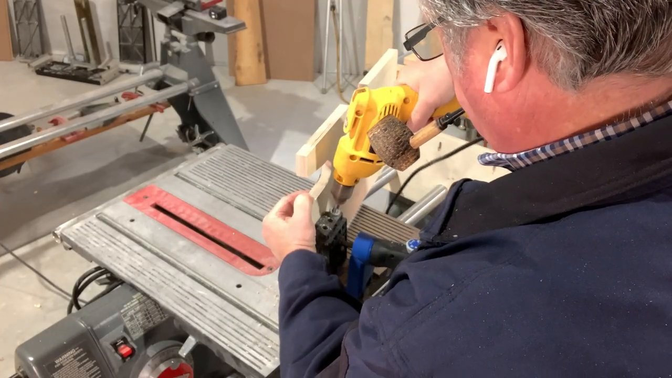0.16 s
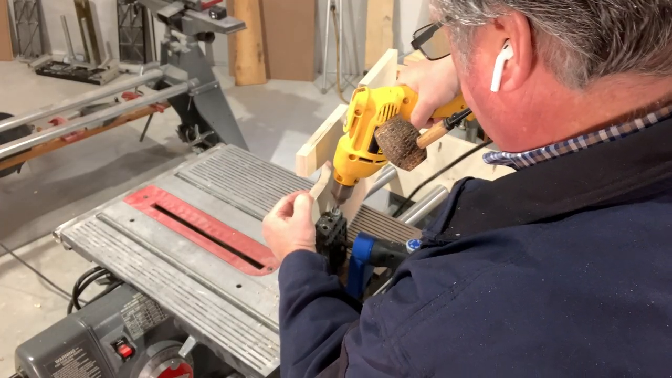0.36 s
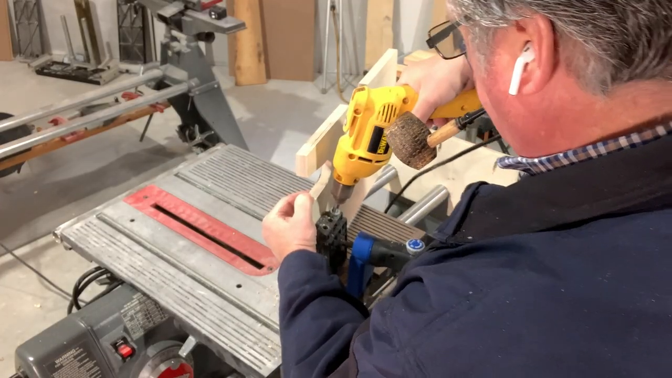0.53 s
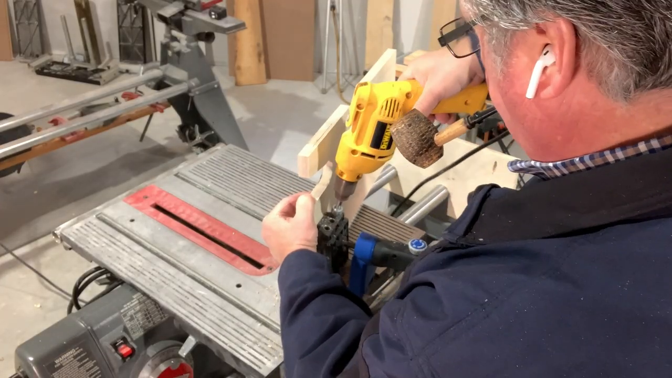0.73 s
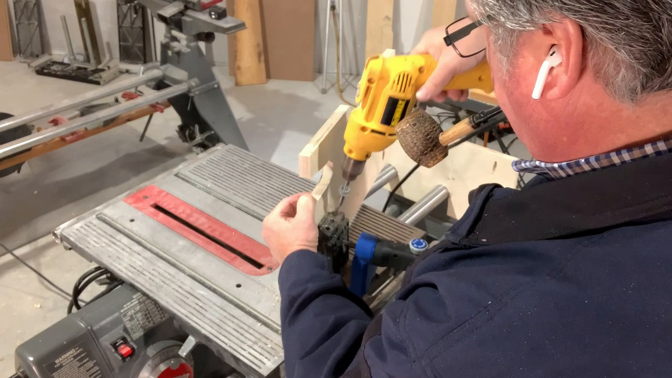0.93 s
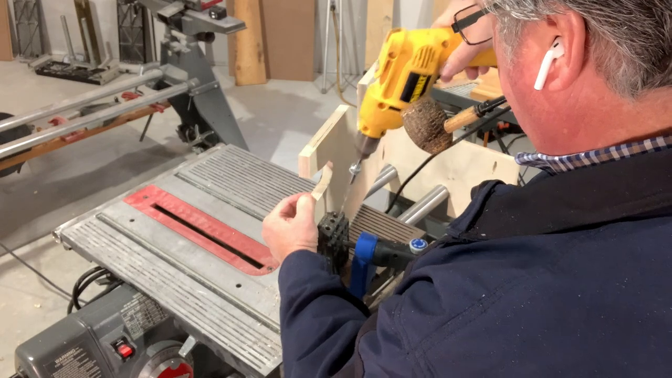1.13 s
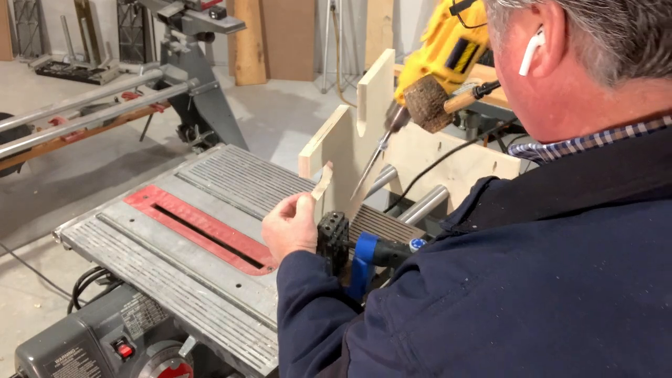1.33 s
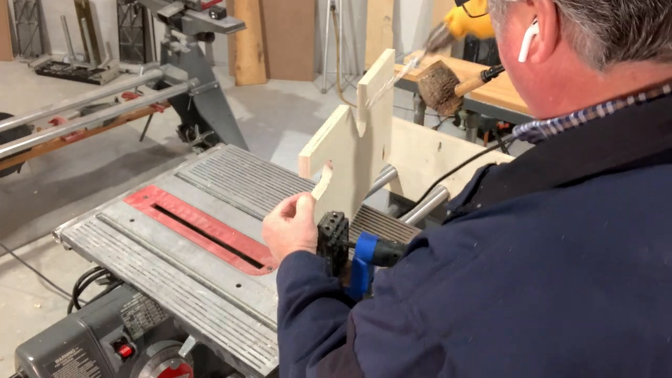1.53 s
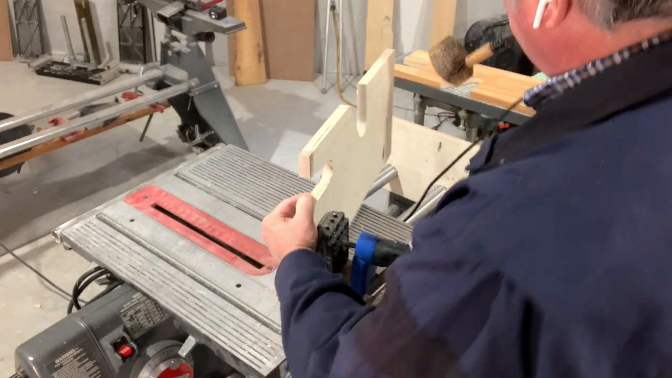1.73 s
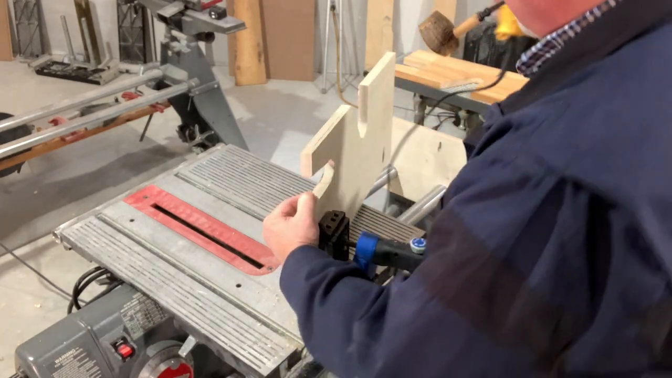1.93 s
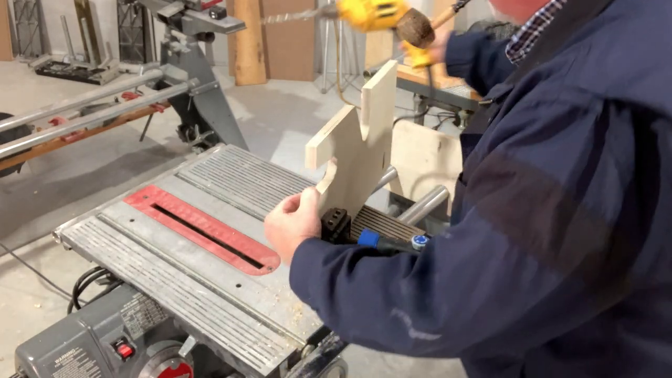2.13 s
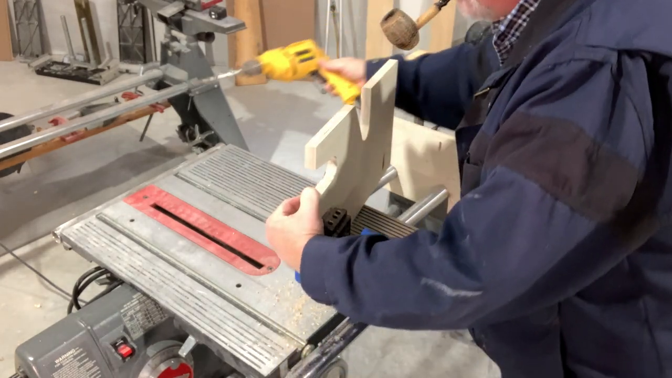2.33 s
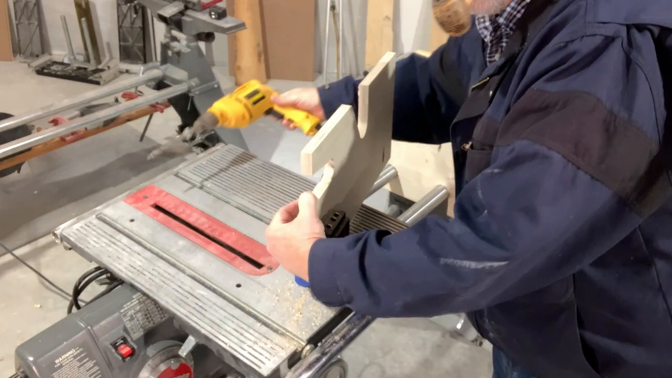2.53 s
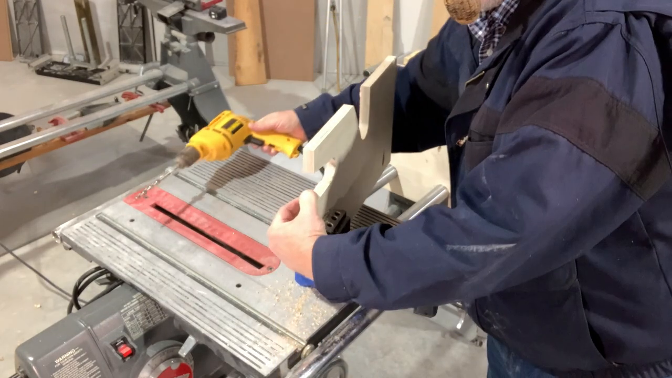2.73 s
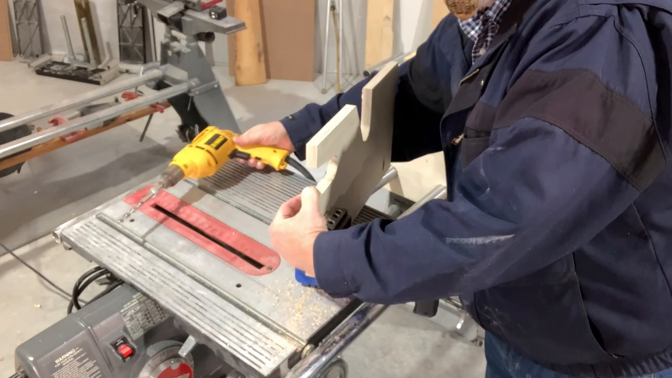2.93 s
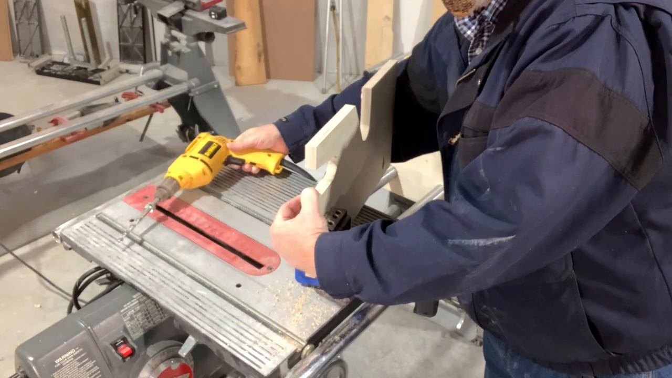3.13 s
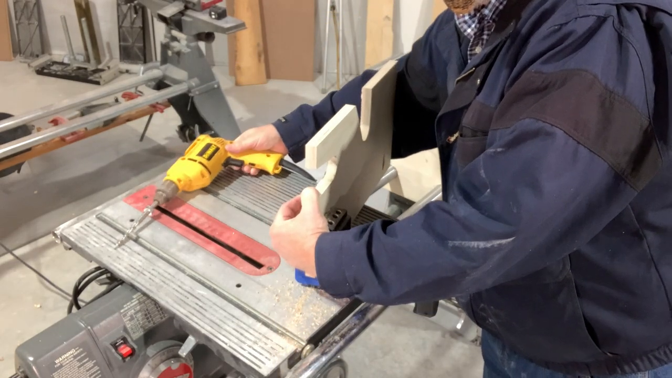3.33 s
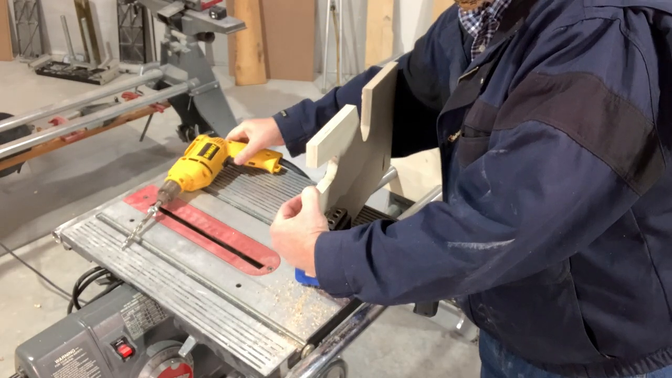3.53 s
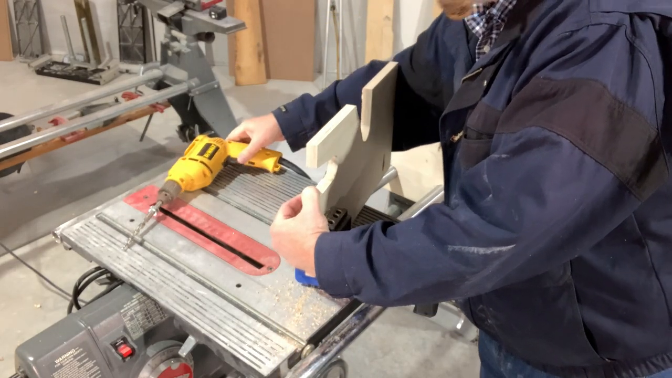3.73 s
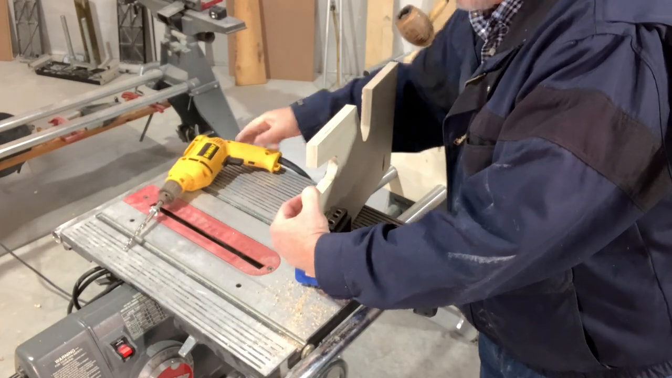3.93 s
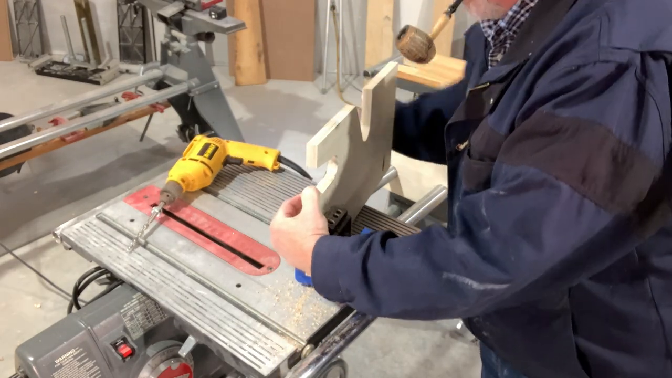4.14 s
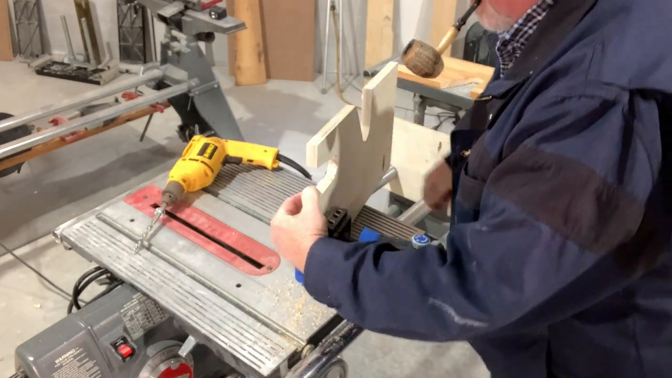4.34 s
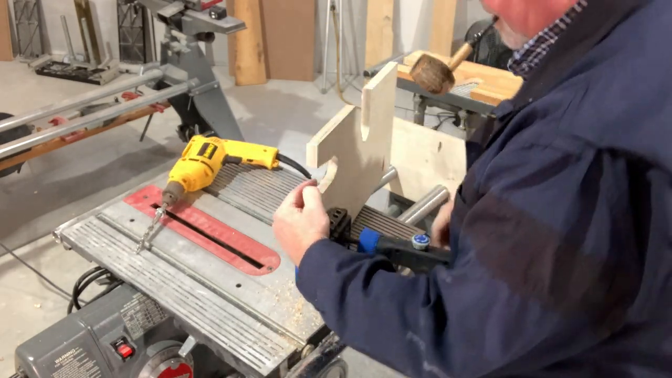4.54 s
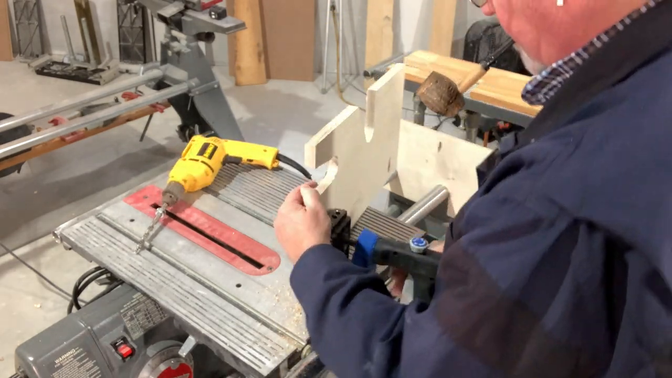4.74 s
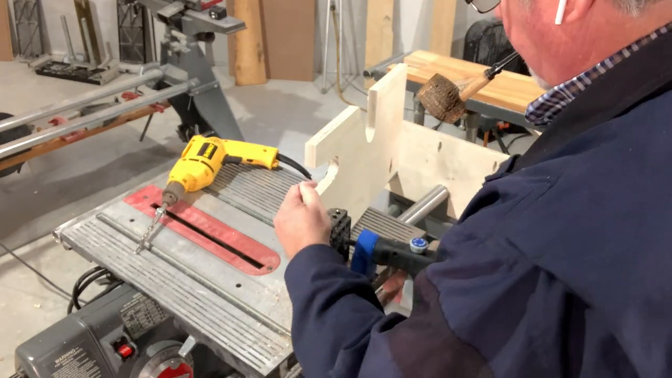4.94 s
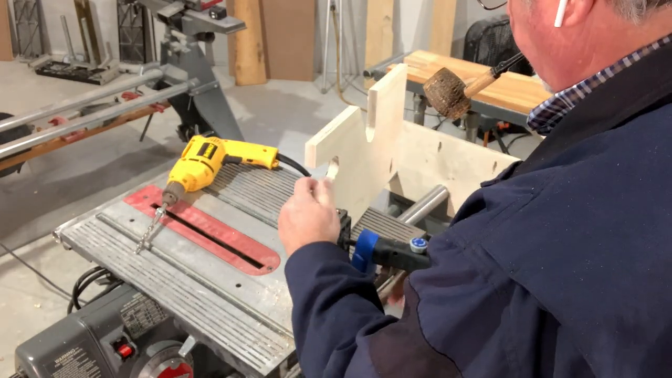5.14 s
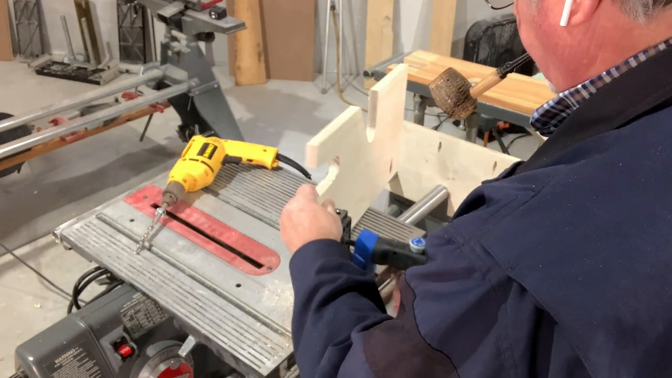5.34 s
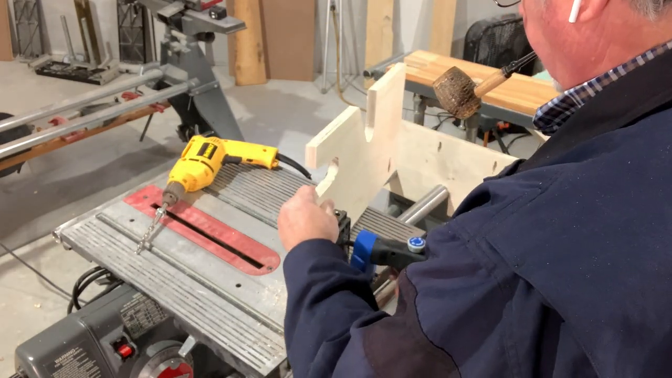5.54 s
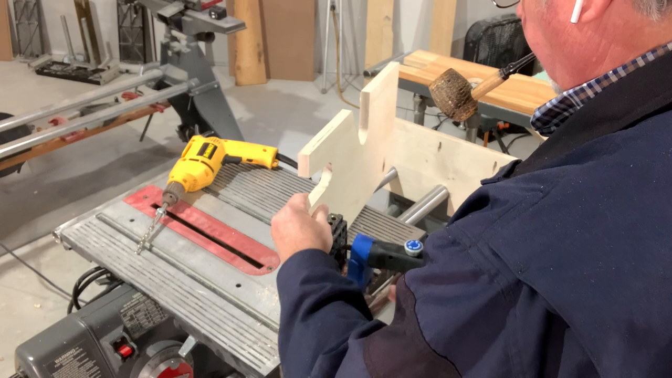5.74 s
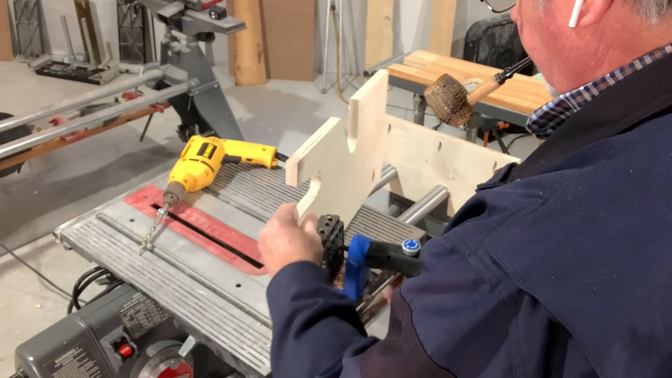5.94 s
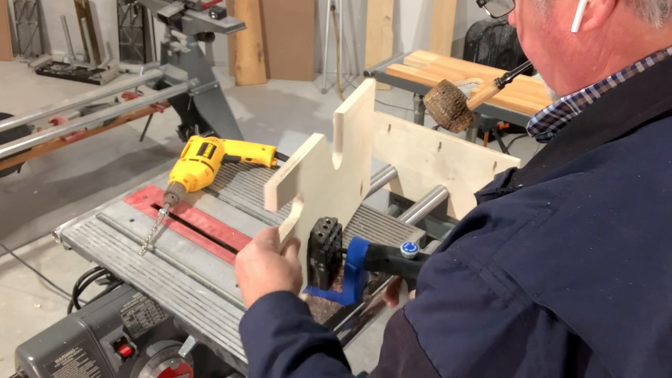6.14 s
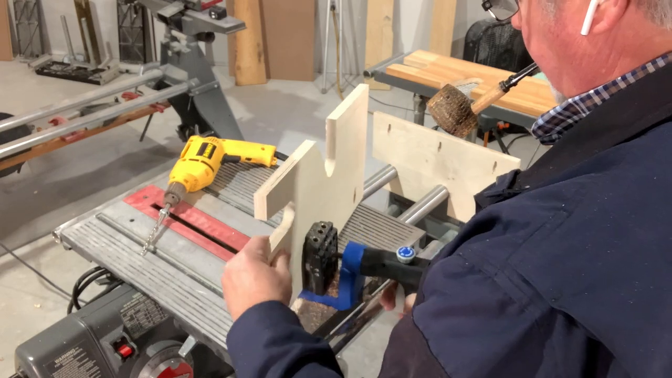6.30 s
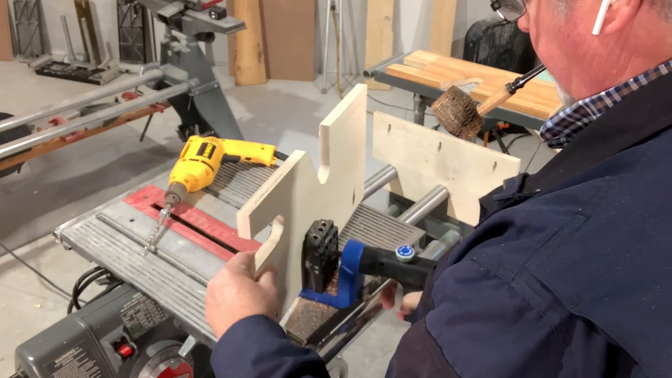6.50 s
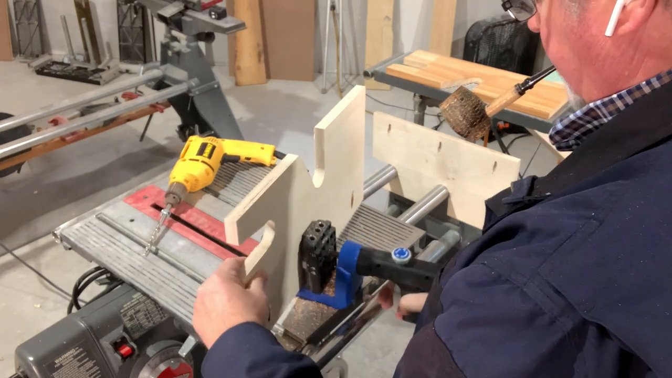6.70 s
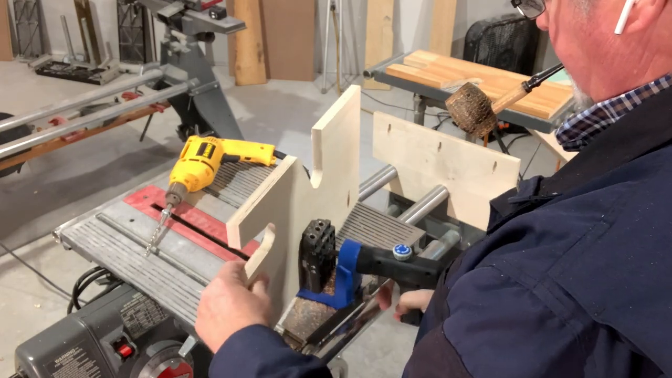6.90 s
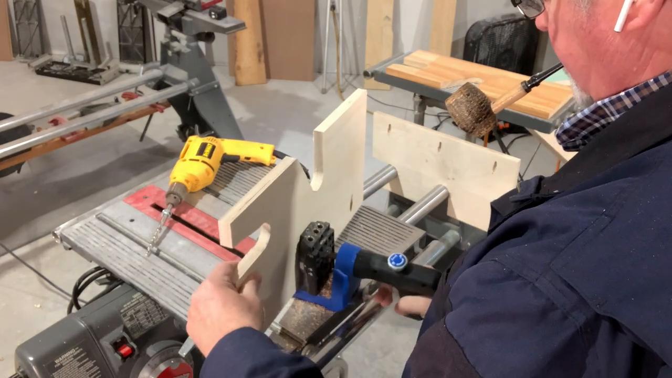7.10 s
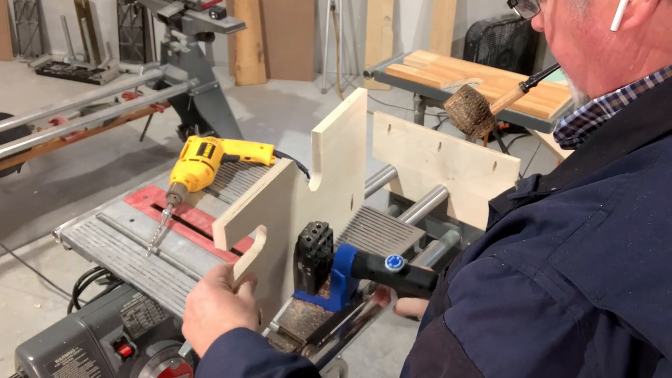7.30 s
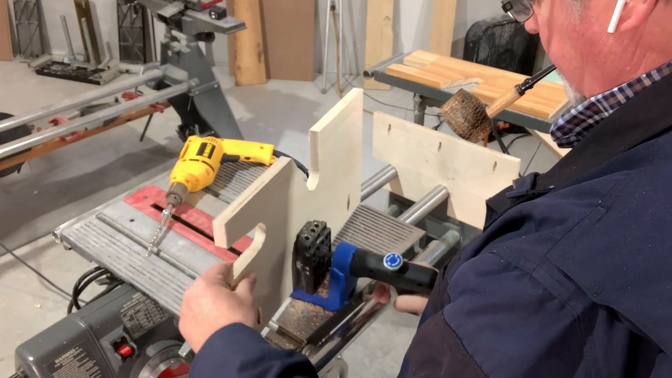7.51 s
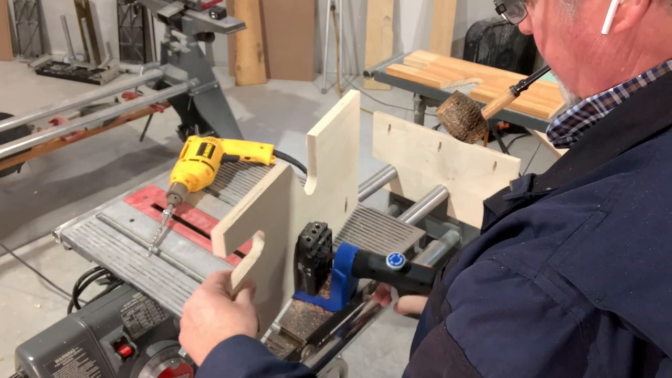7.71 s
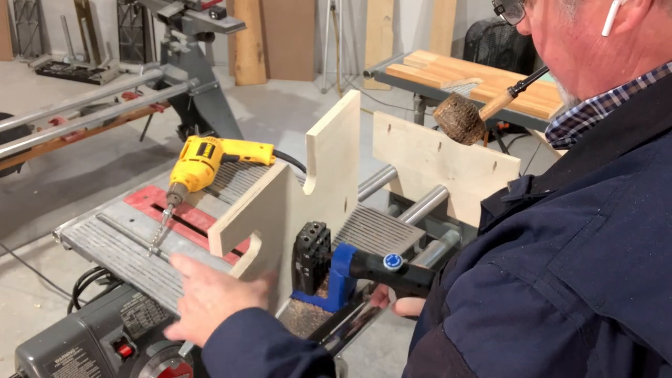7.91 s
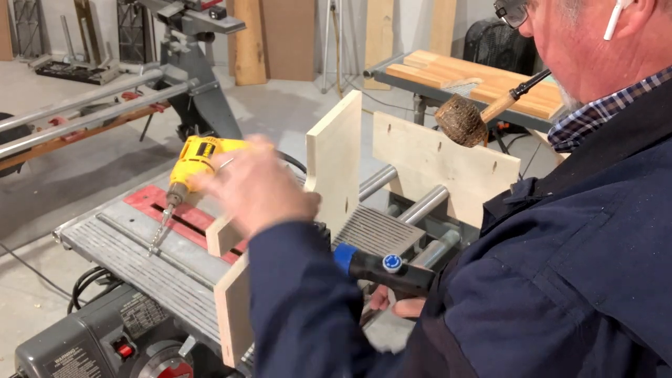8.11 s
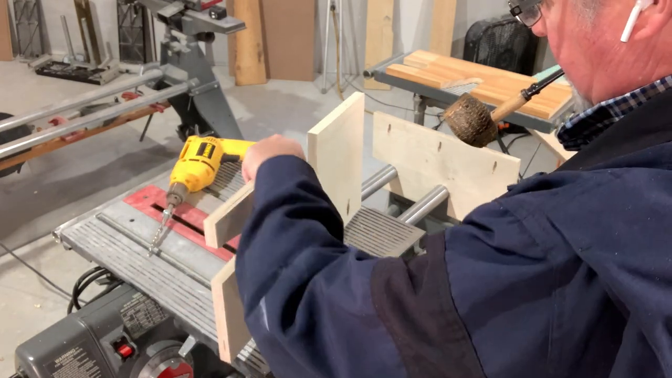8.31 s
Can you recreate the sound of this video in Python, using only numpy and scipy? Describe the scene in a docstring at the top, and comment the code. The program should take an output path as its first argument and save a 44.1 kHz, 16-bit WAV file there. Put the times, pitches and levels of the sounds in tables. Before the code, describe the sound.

Close, mono-like sound in a hard, moderately reverberant workshop. From 0 s a corded drill bores plywood: rushing fan, bright brush hiss, high whine and low gear growl. Its pitch sags until about 0.5 s, then climbs to 1.05 s as the load eases. Let go, it coasts down, powered noise fading by 1.6 s, hiss briefly muffled, whistles gliding lower into a coarse slowing scrape that stops near 3.8 s. Wooden knocks fall at 2.24 and 2.96 s; the bit clinks brightly on a metal table at 3.27 s, skidding with a short singing note, and a board taps at 3.58 s. Quiet shop air follows. Cloth rustles at 5.1 s, a clamp snaps at 5.4 s, and a board clacks loudest at 5.84 s, knocking again at 6.07 and 6.38 s amid rattles and rustle at 6.2 s. A low wavering drone rises from 5.6 s, with faint ticks near 7.1 and 7.7 s.

```python
"""In a workshop a corded drill bores plywood, is pulled out, let go and coasts to a stop on a metal saw table.
Noise, tones and a rough surface read at the shaft angle follow the motor; the bit clinks and skids on the metal.
A clamp snaps open and the board knocks about in its jig: clatters excite each body and its decaying modes.
A sleeve rustles as grainy noise, and a low drone of wavering sines sounds over the quiet air of the shop."""
import sys
import numpy as np
from scipy import signal
from scipy.fft import rfft, irfft, next_fast_len
from scipy.io import wavfile
from scipy.ndimage import map_coordinates

SR = 44100
rng = np.random.default_rng(int(sys.argv[2]) if len(sys.argv) > 2 else 0)


def to_wav(sig):
    """Store sig (one row per channel, or 1-D mono) as 16-bit WAV at the path in sys.argv[1].

    Samples outside -1..1 are clipped; the rate is SR.
    """
    pcm = np.clip(np.atleast_2d(sig), -1, 1) * 32767
    pcm = np.round(pcm).astype(np.int16)
    wavfile.write(sys.argv[1], SR, pcm.T)  # frames by channels


N = 368676
TIME = np.arange(N) / SR
CRAWL_HZ = 10  # the lowest shaft speed
# Load on the bit as it bites. Each row: time in seconds, level of the gear growl in dB.
BITE_LOAD = [(0, -42.5), (.2, -42.5), (.32, -37.5), (.55, -37.5), (.7, -42), (1.15, -47), (1.6, -83)]


def amp(db):
    """Level: 20 dB are a factor of ten in amplitude."""
    return 10 ** (np.asarray(db) / 20)


def evened(x):
    """Normalization: scales to rms 1."""
    return x / np.sqrt(np.mean(x ** 2) + 1e-20)


def read(points, hz):
    """Interpolation of a spectrum table on a logarithmic frequency axis."""
    f, value = np.transpose(points)
    return np.interp(np.log(hz + 1), np.log(f + 1), value)


def curves(rows):
    """Linear interpolation of each column of a time table, sample by sample."""
    s, *columns = np.transpose(rows)
    return [np.interp(TIME, s, c) for c in columns]


def add(mix, s, sound):
    """Superposition: mixes a sound in at time s."""
    part = mix[round(s * SR):][:len(sound)]
    part += sound[:len(part)]


def ramp(middle_s, length_s):
    """Linear transition from 0 to 1, centred on a moment."""
    return np.clip((TIME - middle_s) / length_s + .5, 0, 1)


def swell(s, db, half_s):
    """Gaussian envelope: a smooth rise and fall around a moment."""
    return amp(db) * np.exp(-((TIME - s) / half_s) ** 2)


def colour(x, points):
    """Zero-phase filtering by a spectrum table, to rms 1."""
    size = next_fast_len(len(x))
    gain = amp(read(points, np.fft.rfftfreq(size, 1 / SR)))
    return evened(irfft(rfft(x, size) * gain, size)[:len(x)])


def noise(points):
    """Stationary noise: white noise given a spectral colour."""
    return colour(rng.standard_normal(N), points)


def wander(rate_hz):
    """Slow random fluctuation: noise under a Gaussian low-pass, rms 1."""
    size = next_fast_len(N)
    hz = np.fft.rfftfreq(size, 1 / SR)
    lowpass = np.exp(-(hz / rate_hz) ** 2)
    return evened(irfft(rfft(rng.standard_normal(size)) * lowpass, size)[:N])


def impulses(per_s):
    """Poisson-like shower: sparse impulses of random height and sign."""
    return (rng.random(N) < per_s / SR) * (2 * rng.random(N) - 1)


def causal(points, tilt_db, size=2048):
    """Minimum phase: the sharp-fronted response of a body with this spectrum, tilted about 1 kHz."""
    hz = abs(np.fft.fftfreq(size, 1 / SR))
    tilt = tilt_db * np.log2(np.maximum(hz, 250) / 1000)
    log_gain = np.log(amp(np.maximum(read(points, hz), -70) + tilt))
    # the Hilbert transform of the log gain gives the phase
    return np.fft.ifft(np.exp(np.conj(signal.hilbert(log_gain)))).real[:size // 2]


def ringing(modes):
    """Forced resonance: steady scraping heard through a few resonances, rms 1."""
    size = next_fast_len(N)
    hz = np.fft.rfftfreq(size, 1 / SR)
    gain = sum(amp(db) / (1 + (2 * (hz - f) / width) ** 2) for f, width, db in modes)
    return evened(irfft(rfft(rng.standard_normal(size)) * gain, size)[:N])


def room_tail(order=6):
    """Reverberation: dense reflections from near walls and machines, each band with its own decay; energy 1."""
    # Decay of the room. Each row: frequency in Hz, time to fall 60 dB in seconds.
    room_decay = [(150, 2.1), (400, 1.02), (1000, 1.03), (2800, 0.76), (7000, 0.51), (15000, 0.26)]
    taps = rng.choice([-1., 1.], SR) * (rng.random(SR) < 1 / order) * (TIME[:SR] > .003)
    hz, t, bands = signal.stft(taps, SR, nperseg=256)
    decay = amp(-60 * t / read(room_decay, hz)[:, None])
    tail = signal.istft(bands * decay, SR, nperseg=256)[1][:SR]
    return tail / np.linalg.norm(tail)


def workshop(x, wet_db):
    """Direct and diffuse field: sound and its reverberation together, at the same power."""
    wet = signal.fftconvolve(x, room_tail())[:N]
    return (x + amp(wet_db) * wet) / np.sqrt(1 + amp(wet_db) ** 2)


def nearby(x, echo_db=-19):
    """Comb filtering: faint single echoes from hard surfaces close by ripple the spectrum."""
    # First echoes from table, board, floor and wall. Each entry: delay in seconds.
    echo_delays = [.0017, .0041, .0067, .0103, .0151, .0209]
    out = x.copy()
    for delay_s in echo_delays:
        add(out, delay_s, amp(echo_db) * x)
    return out / np.sqrt(1 + len(echo_delays) * amp(echo_db) ** 2)


def background(waver=.004, swell_db=2, rumble_db=-12):
    """Slow modulation: a drone of sines wavers in pitch and level, with rumble, over the air of the shop."""
    # Upper tones of the drone. Each row: final pitch in Hz, relative level in dB.
    drone_tones = [(73, -6.5), (94, -2), (117, -10.5), (126, -6)]
    # Upper drone. Each row: time in seconds, level in dB.
    drone_upper = [(0, -59), (2.2, -60), (3.2, -49), (4.0, -58), (5.55, -47), (5.8, -44), (6.9, -42),
                   (7.5, -41), (8.36, -55)]
    # Quiet air of the shop. Each row: frequency in Hz, relative density in dB per Hz.
    air_colour = [(25, -8.5), (50, 1.5), (100, -11), (170, -13), (230, -2), (400, -13), (700, -16.5),
                  (1100, -22), (3000, -28.5), (7000, -38), (15500, -41.5)]
    # One deep rumble. Entries: time of its height in seconds, level in dB, half length in seconds.
    deep_swell = (2.3, -52.5, .8)
    # the drone's base steps up and sinks in pitch around swell_s, then goes on growing
    swell_s, rise_s, sag = 5.62, .2, .04
    quiet_db, loud_db, growth_db_per_s = -61, -52, 3.5
    loud, (upper_db,) = ramp(swell_s, rise_s), curves(drone_upper)
    pitch = 1 + sag * (1 - loud)
    base_db = (1 - loud) * quiet_db + loud * (loud_db + growth_db_per_s * (TIME - swell_s))

    def tone(hz):
        """Frequency and amplitude modulation: one wavering line of the drone."""
        cycles = np.cumsum(hz * pitch * (1 + waver * wander(3.6))) / SR
        return amp(swell_db * wander(2.1)) * np.sin(2 * np.pi * cycles)

    base = amp(base_db) * evened(tone(57.8))
    upper = evened(sum(amp(db) * tone(hz) for hz, db in drone_tones))
    rumble = noise([(20, -12.0), (45, -12.5), (130, -3.5), (170, -2.0), (300, -9.5), (700, -12.0),
                    (2000, -31.5), (8000, -55.5)])
    deep = swell(*deep_swell) * noise([(20, -16), (45, -3.5), (75, 3.5), (120, -18), (400, -48.5), (4000, -90.5)])
    air = amp(-55) * noise(air_colour)
    return base + amp(upper_db) * (upper + amp(rumble_db) * rumble) + deep + air


def sleeve(grain_db=3, catches_per_s=45, catch_db=-8):
    """Stick-slip friction: cloth slides in small uneven catches, swelling with each move of the arm; some tick."""
    # Strokes of the sleeve. Each row: time of its height in seconds, level in dB, half length in seconds.
    strokes = [(4.63, -68, 0.52), (5.133, -47.5, 0.084), (6.186, -48, 0.22), (6.746, -67.5, 0.36),
               (7.1, -54, .035), (7.38, -60, .03), (7.67, -60.5, 0.064), (8.35, -63, 0.12)]
    # Each row: frequency in Hz, relative density in dB per Hz.
    cloth_colour = [(300, -22.5), (700, -2), (1500, -7.5), (3200, -4.5), (6000, -7.5), (9000, -12),
                    (15500, -13.5)]
    tick_body = causal([(500, -22), (2400, -14), (3300, 2), (4500, -12), (15000, -14)], 0)
    ticking = evened(signal.fftconvolve(impulses(catches_per_s), tick_body)[:N])
    cloth = amp(grain_db * wander(90)) * noise(cloth_colour) + amp(catch_db) * ticking
    return workshop(sum(swell(*stroke) for stroke in strokes) * cloth, wet_db=-4.5)


def blows(rows, spectrum, modes, ring_db, rise_s, wet_db):
    """Impact: a quick clatter of contacts sounds the body, fills the room and leaves free modes decaying."""
    out, t = np.zeros(N), TIME[:SR]
    for s, db, tilt_db, length_s in rows:
        rise = 1 - np.exp(-t / rise_s)
        contacts = rng.choice([-1., 1.], SR) * (rng.random(SR) < .5) * np.exp(-t / length_s) * rise
        echoes = room_tail() * (1 - np.exp(-t / length_s))  # the room fills while the clatter lasts
        body = causal(spectrum, tilt_db)
        thud, tail = (evened(signal.fftconvolve(part, body)[:SR]) for part in (contacts, echoes))
        ring = np.zeros(SR)
        for hz, mode_db, t60 in modes:
            decay_db = mode_db + tilt_db * np.log2(hz / 1000) - 60 * t / t60
            ring += amp(decay_db) * np.sin(2 * np.pi * (hz * t + rng.random()))
        blow = thud + amp(wet_db) * tail + amp(ring_db) * evened(ring * rise)
        add(out, s, amp(db) * np.sqrt(.02) * blow)  # db: rms level of the thud's energy packed into 20 ms
    return out


def handling(settle_db=-17, settle_s=0.096, rattles_per_s=60):
    """Impact excitation: board, bit, clamp and fingers; each sound of the board leaves the loose jig rattling."""
    # Wooden knocks and one low rub (3.44 s), the bit on the saw table, the clamp letting go, ticks of fingers and jig.
    # Each row: start in seconds, level in dB, brightness in dB per octave, decay time of the clatter in seconds.
    board_sounds, clinks, snaps, ticks = [(2.239, -26.5, -3, 0.011), (2.262, -31.5, 1.5, 0.0056),
                                          (2.366, -38, 0, .006), (2.96, -26, 0, 0.0071),
                                          (3.44, -38.5, 1.5, 0.019), (3.582, -29, 0.3, 0.0047),
                                          (4.725, -46.5, 0, 0.06), (5.843, -14, -0.5, 0.029),
                                          (6.068, -30, 0.5, 0.018), (6.384, -22.5, -1.5, 0.024),
                                          (7.701, -46.5, 0, 0.0043), (8.323, -52.5, 1, .008)], [(3.233, -37, 1, .004), (3.268, -19.5, 3, 0.011),
                                                          (3.307, -31, -2, 0.0092)], [(5.405, -19, -0.5, 0.0081)], [(4.528, -48.5, 6, .015),
                                                                                         (4.928, -52.5, 6.5, 0.06),
                                                                                         (5.748, -44, 3, 0.045),
                                                                                         (6.156, -50, 6, .012),
                                                                                         (6.61, -62, 9, .012),
                                                                                         (6.81, -52, 1.5, .02),
                                                                                         (7.095, -50.5, -1.5, 0.0055),
                                                                                         (7.375, -62, 4, 0.0084)]
    # Colour of each sound. Each row: frequency in Hz, relative density in dB per Hz before the brightness tilt.
    wood, steel, clamp_colour, tick_colour = [(65, -63), (110, -11.5), (213, -11), (323, 2), (565, -3.5),
                                              (653, -0.5), (1620, -8.5), (2120, -12), (2310, -12),
                                              (3350, -10.5), (4210, -18), (6910, -16), (15500, -34)], [(88, -40.5), (150, -7.5), (253, -6.5),
                                                            (359, -25), (766, -12), (1110, -4.5),
                                                            (1400, -23.5), (2650, -3), (2860, 3),
                                                            (3350, -6.5), (4650, -12), (7270, -13.5),
                                                            (15500, -25)], [(59, -49.5), (100, -29),
                                                                           (134, -29), (275, -8.5),
                                                                           (394, -11), (457, -11),
                                                                           (808, -2.5), (1060, -4.5),
                                                                           (1590, -4), (1960, -15.5),
                                                                           (2420, -11), (5170, -16.5),
                                                                           (7890, -14), (15500, -23.5)], [(300, 11),
                                                                                          (900, 16.5),
                                                                                          (3000, 4.5),
                                                                                          (7000, -5.5),
                                                                                          (15000, -22)]
    # Free modes. Each row: frequency in Hz, relative level in dB before the tilt, 60 dB decay time in seconds.
    wood_modes, steel_modes, clamp_modes = [(285, -25, .25), (311, -4, 0.32), (407, -13.5, 0.23),
                                            (671, -7.5, .3), (846, -11.5, 0.36), (1252, -4.5, 0.13),
                                            (1700, -13, .3), (2080, -13, 0.22)], [(215, -4.5, 0.42), (1106, -6.5, 0.66),
                                                                (1065, -22.5, .45), (2910, 1.5, 0.1),
                                                                (5680, -7.5, 0.13), (7640, -13.5, 0.12),
                                                                (8732, -14, .15), (9555, -18.5, 0.14),
                                                                (10100, -16, .18)], [(146.4, -10.5, 0.57),
                                                                                     (393, -4.5, 0.88),
                                                                                     (850, 0.5, 0.91),
                                                                                     (910, -1, .6),
                                                                                     (1135, 2, .48),
                                                                                     (1593, 0, 0.64),
                                                                                     (2390, -18, 0.27),
                                                                                     (7687, -25.5, .25)]
    board = blows(board_sounds, wood, wood_modes, ring_db=-4.5, rise_s=0.0042, wet_db=-3)
    bit = blows(clinks, steel, steel_modes, ring_db=-1, rise_s=0.00031, wet_db=-2.5)
    clamp = blows(snaps, clamp_colour, clamp_modes, ring_db=-2.5, rise_s=0.0011, wet_db=1.5)
    fingers = blows(ticks, tick_colour, wood_modes, ring_db=-17, rise_s=0.0027, wet_db=0.5)
    shaken = np.zeros(N)
    for s, db, _, _ in board_sounds:
        shaken += amp(db + settle_db) * (TIME > s) * np.exp(-abs(TIME - s) / settle_s)
    contacts = evened(impulses(rattles_per_s))
    rattle = shaken * evened(signal.fftconvolve(contacts, causal(wood, 0))[:N])
    return board + bit + clamp + fingers + workshop(rattle, wet_db=-3)


def skid(flutter_db=-0.5):
    """Friction-driven resonance: the still turning bit scrapes the metal table and keeps it singing."""
    # Modes kept ringing. Each row: frequency in Hz, width at half amplitude in Hz, relative level in dB.
    skid_modes = [(225, 48, -6), (1120, 33, -0.5), (2310, 68, -8), (2860, 55, -13)]
    # The table's note. Entries: frequency in Hz, level in dB.
    note_hz, note_db = (1112, -45.5)
    start_s, rise_s, hold_s, fade_db_per_s = 3.268, .05, 0.2, 103
    t = TIME - start_s
    envelope = np.clip(t / rise_s, 0, 1) * amp(-fade_db_per_s * np.maximum(t - hold_s, 0))
    note = amp(note_db + flutter_db * wander(30)) * np.sin(2 * np.pi * note_hz * t + .4 * wander(20))
    return envelope * (amp(-39.5) * ringing(skid_modes) + note)


def shaft():
    """Rotor dynamics: load sets the speed in Hz until let-go, then friction and air drag run it down."""
    # Motor under power, sagging as the bit bites. Each row: time in seconds, shaft speed in Hz.
    motor = [(0.0, 443.8), (0.19, 413.1), (0.26, 397.7), (0.34, 387.7), (0.5, 384.2), (0.6, 387.3),
             (0.8, 402.0), (1.03, 430.0), (1.077, 431.0)]
    # air drag matches dry friction at drag_hz; from grip_s on the bearings grip harder
    friction_hz_per_s, drag_hz, grip_s, grip_hz_per_s = 90.85, 298, 2.3, 30
    (driven_hz,), (off_s, off_hz) = curves(motor), motor[-1]
    left = np.arctan(off_hz / drag_hz) - friction_hz_per_s / drag_hz * (TIME - off_s)
    coast_hz = drag_hz * np.tan(np.maximum(left, 0)) - grip_hz_per_s * np.maximum(TIME - grip_s, 0)
    return np.where(TIME < off_s, driven_hz, np.maximum(coast_hz, CRAWL_HZ))


def by_speed(law, speed):
    """Power law: gain of a part at this share of full speed."""
    full_db, db_per_octave = law
    return amp(full_db + db_per_octave * np.log2(speed))


def fan(speed, powered, mesh, sparks_per_s=600, spark_db=-11, housing_db=-8):
    """Flow noise: air rushes through the housing, joined by brush sparks that die away after let-go."""
    # Each row: frequency in Hz, relative density in dB per Hz.
    rush_powered, rush_coasting = [(410, -40.5), (700, -11), (1250, -2.5), (1980, 1), (2340, -3), (3180, 1),
                                   (4210, -3), (4980, 1), (5880, -3.5), (7130, 0), (8980, -8.5),
                                   (10900, -10), (15000, -24)], [(410, -26.5), (700, -7), (1100, -5.5), (1400, -6),
                                                         (1950, -3), (2800, -5.5), (3300, -6.5),
                                                         (4100, -2.5), (5500, -7.5), (7500, -7.5),
                                                         (12000, -20), (15600, -22)]
    # Resonances of the housing. Each row: frequency in Hz, width at half amplitude in Hz, relative level in dB.
    housing = [(827, 41, 0), (1327, 40, -2.5), (1544, 36, 0.5), (1950, 130, -2), (2090, 75, -6),
               (2677, 320, 0.5), (3080, 140, -1.5), (3340, 100, -2.5), (4180, 160, -10.5)]
    # Speed laws. Entries: level in dB at full speed, slope in dB per octave of speed.
    powered_law, coasting_law = (-18, 8.6), (-26.5, 3.98)
    gain = powered * by_speed(powered_law, speed) + (1 - powered) * by_speed(coasting_law, speed)
    rush = np.sqrt(powered) * noise(rush_powered) + np.sqrt(1 - powered) * noise(rush_coasting)
    rush = evened(rush + amp(housing_db) * ringing(housing))
    sparks = colour(impulses(sparks_per_s), [(800, -21.0), (2500, 2.5), (7000, -5), (15000, -3.5)])
    crackle = amp(spark_db) * powered * workshop(sparks, wet_db=-10.0)
    return gain * (rush * mesh + crackle)


def brushes(angle, speed, powered, mesh, slow_throb=0.33):
    """Sliding friction: the brushes hiss, and the hiss falls apart into one swish a turn as the shaft crawls."""
    # Each row: frequency in Hz, relative density in dB per Hz.
    brush_colour = [(6000, -30.5), (9000, -5), (11500, -4), (14500, -3), (16000, -8)]
    # Shading as the drill passes behind the body and is laid on the table. Each row: time in seconds, gain in dB.
    shade = [(1.3, 3), (1.5, -10), (1.7, -16), (1.9, -3.5), (2.45, 0), (3.17, 1), (3.36, -2), (3.6, 1)]
    # Speed laws. Entries: level in dB at full speed before the shading, slope in dB per octave of speed.
    powered_law, coasting_law = (-27, 30), (-26.5, 6.5)
    shade_db, = curves(shade)
    gain = powered * by_speed(powered_law, speed) + (1 - powered) * by_speed(coasting_law, speed)
    swish = 1 + slow_throb * (1 - speed) ** 4 * np.cos(angle)
    return amp(shade_db) * gain * noise(brush_colour) * mesh * swish


def case_and_rub(speed, powered, hole_db=9.0):
    """Structure-borne noise: the gear case hums as filtered noise, and the bit rubs harder in the hole."""
    # Each row: frequency in Hz, relative density in dB per Hz.
    case_colour, rub_colour = [(700, -30.5), (950, -4.5), (1120, -2), (1280, -5.5), (1600, -21)], [(90, -31), (150, -17), (220, -9.5), (310, -0.5), (480, 4),
                                                  (560, -5.5), (700, 0), (1100, -12)]
    # Speed laws. Entries: level in dB at full speed (case: once coasting), slope in dB per octave of speed.
    case_law, rub_law = (-25, 11.4), (-44.5, 4)
    bite_db, = curves(BITE_LOAD)
    case = by_speed(case_law, speed) * noise(case_colour) * (1 - .5 * powered)
    rub = np.hypot(by_speed(rub_law, speed), amp(bite_db + hole_db))  # the powers add
    return case + rub * noise(rub_colour)


def fan_whine(angle, shaft_hz, blades=13, flutter_db=2.5):
    """Blade-passing tone: blades times the shaft speed, as loud as the housing lets that pitch out."""
    # Each row: frequency in Hz, level in dB before the flutter.
    whine_levels = [(2000, -59.5), (2600, -36.5), (3150, -36), (3950, -34.5), (4350, -21), (4950, -19),
                    (5150, -33.5), (5400, -26.5), (5520, -23), (5620, -19)]
    level_db = read(whine_levels, blades * shaft_hz) + flutter_db * wander(25)
    return amp(level_db) * np.sin(blades * angle)


def armature(angle, speed):
    """Order tones: unbalance and gears sound at shaft multiples, fade with speed and are gone at half speed."""
    # Turning armature. Entries: multiples of the shaft speed; their levels in dB at full speed before flutter.
    shaft_orders, shaft_db = [1, 4, 8, 12, 20, 26, 39], [-35.5, -36.5, -34, -31.5, -40, -29.5, -44]
    fade = speed ** 2 * np.clip((speed - .5) / 0.27, 0, 1)
    return fade * sum(amp(db + 3.3 * wander(8.3)) * np.sin(k * angle) for k, db in zip(shaft_orders, shaft_db))


def bearings(angle, shaft_hz, speed, width_hz=70, patchy_db=4):
    """Narrow-band noise: fuzzy whistles come and go as they glide down and fade with the coasting shaft."""
    # Free-running bearings. Entries: multiples of the shaft speed; their levels in dB at full speed.
    bearing_orders, bearing_db = [9, 13.4, 26, 71], [-41, -38.5, -45, -35]
    whistles = np.zeros(N)
    for k, db in zip(bearing_orders, bearing_db):
        fuzzy = wander(width_hz) * np.cos(k * angle) + wander(width_hz) * np.sin(k * angle)
        audible = np.clip((SR / 2 - k * shaft_hz) / 2000, 0, 1)  # silent above half the sample rate
        whistles += amp(db + patchy_db * wander(4.1)) * fuzzy * audible
    return speed ** 2 * whistles


def commutator(angle, shaft_hz, speed, powered, stall_hz=65, size=1024):
    """Surface roughness read at the shaft angle: the scrape's colour sinks with speed and fades at the stall."""
    # Roughness past the brushes. Each row: multiple of the shaft speed, relative level in dB.
    wear = [(1, -41), (9, -23), (12, -21), (13.4, -1.5), (15, -22.5), (17, 0.5), (19, -12.5), (22, -5.5),
            (26, 6), (31, 0), (36, -5.5), (50, -1.5), (62, -14.5), (75, -14.5), (92, -15.5), (110, -14.5),
            (180, -27)]
    # Speed law. Entries: level in dB at full speed, slope in dB per octave of speed.
    scrape_law = (-40, 1.5)
    place = angle / (2 * np.pi) * size
    length = next_fast_len(int(place[-1]) + size)
    multiple = np.fft.rfftfreq(length, 1 / size)
    surface = rfft(rng.standard_normal(length)) * amp(read(wear, multiple))
    scrape = np.zeros(N)
    for low, high in [(0, 40), (40, 70), (70, 110), (110, 180)]:
        # fine ridges are heard only once the shaft is slow
        audible = np.clip((SR / 2 - high * shaft_hz) / 2000, 0, 1)
        ridges = irfft(surface * (multiple >= low) * (multiple < high), length)
        scrape += audible * map_coordinates(ridges, [place], order=1)
    moving = np.clip((shaft_hz - CRAWL_HZ) / stall_hz, 0, 1)
    gain = (1 - powered) * by_speed(scrape_law, speed)
    return workshop(gain * moving * evened(scrape), wet_db=2.5)


def boring(angle, flutter_db=3):
    """Gear-train vibration: while the edges cut, the loaded gears growl in a few low tones."""
    # Loaded gear train. Entries: multiples of the shaft speed; their relative levels in dB.
    gear_orders, gear_db = [.36, .535, .8, 1.245, 1.72], [-10, -6.5, -0.5, 0.5, -10.5]
    level_db, = curves(BITE_LOAD)
    growl = np.zeros(N)
    for k, db in zip(gear_orders, gear_db):
        growl += amp(db + flutter_db * wander(5.2)) * np.sin(k * angle + 0.6 * wander(8.4))
    return amp(level_db) * evened(growl)


def drill(jitter=0.00057, shake_db=0.66, teeth=0.13):
    """Rotating machine: one shaft angle and speed drive the rush, hiss, tones, whistles, scrape and growl."""
    shaft_hz = shaft()
    angle = 2 * np.pi * np.cumsum(shaft_hz * (1 + jitter * wander(50))) / SR
    speed = shaft_hz / shaft_hz.max()
    powered = 1 - ramp(1.386, 0.49)  # share of the powered sound, dying away after let-go
    turning = np.clip((3.79 - TIME) / .13, 0, 1)  # fades over the last turn
    # the gears rub harder once a turn, and the hand-held bit shakes them unevenly
    mesh = (1 + teeth * np.cos(angle)) * amp(shake_db * wander(76))
    rattle = fan(speed, powered, mesh) + brushes(angle, speed, powered, mesh)
    noises = turning * (rattle + case_and_rub(speed, powered))
    whistles = (1 - powered) * bearings(angle, shaft_hz, speed)
    tones = turning * (fan_whine(angle, shaft_hz) + armature(angle, speed) + whistles)
    scrape = commutator(angle, shaft_hz, speed, powered)
    return workshop(nearby(noises), wet_db=-10.5) + workshop(tones, wet_db=-12.5) + scrape + boring(angle)


def scene():
    """Superposition: all sources add and reach both channels alike."""
    mono = background() + sleeve() + handling() + skid() + drill()
    return np.array([mono, mono])


def record(dry):
    """Band limitation: a linear-phase low-pass ends the spectrum at 15850 Hz."""
    lowpass = signal.firwin(511, 15850, window=("kaiser", 9), fs=SR)
    return signal.oaconvolve(dry, lowpass[None], "same")


dry = scene()
out = record(dry)
to_wav(out)
```